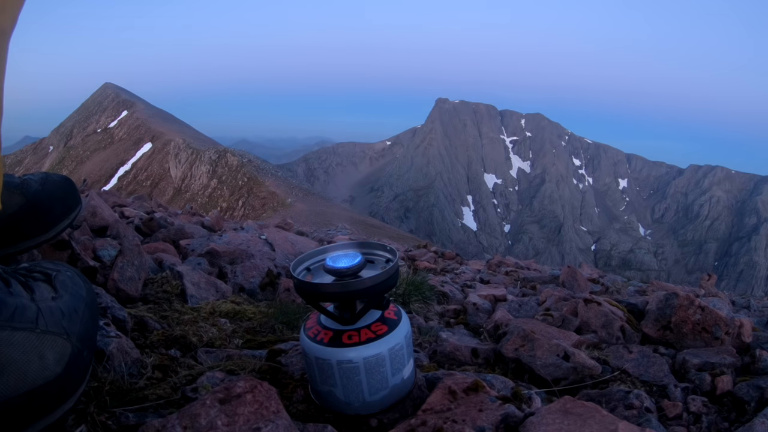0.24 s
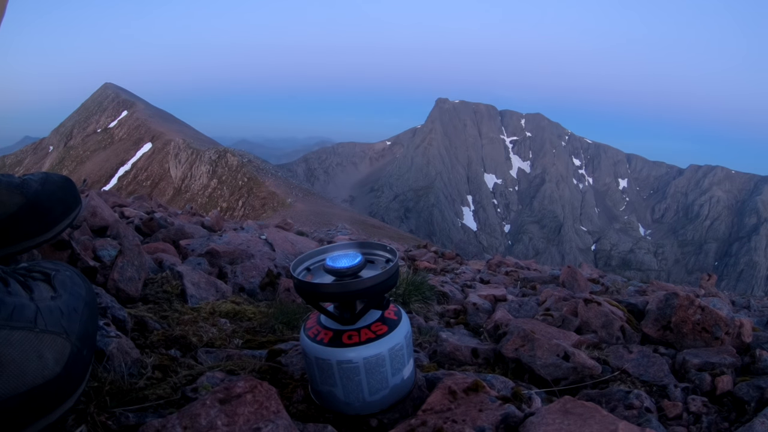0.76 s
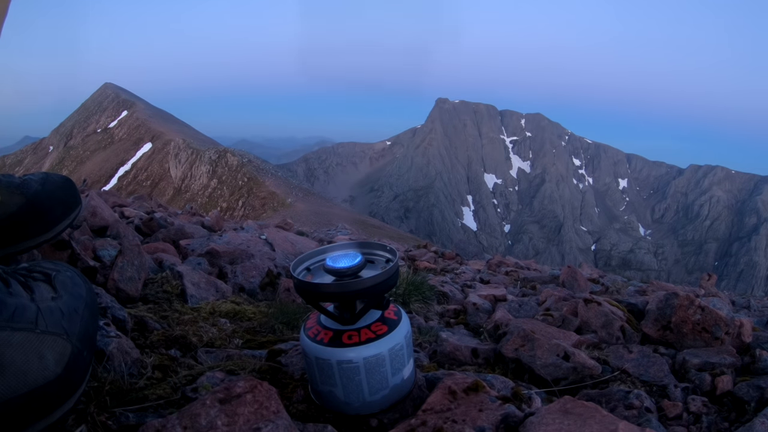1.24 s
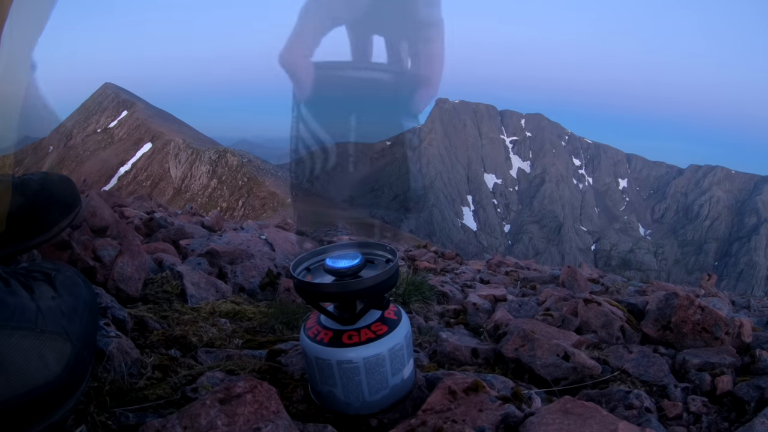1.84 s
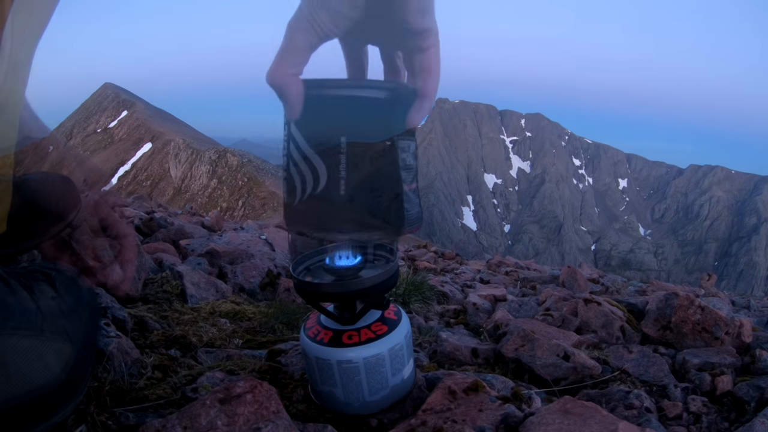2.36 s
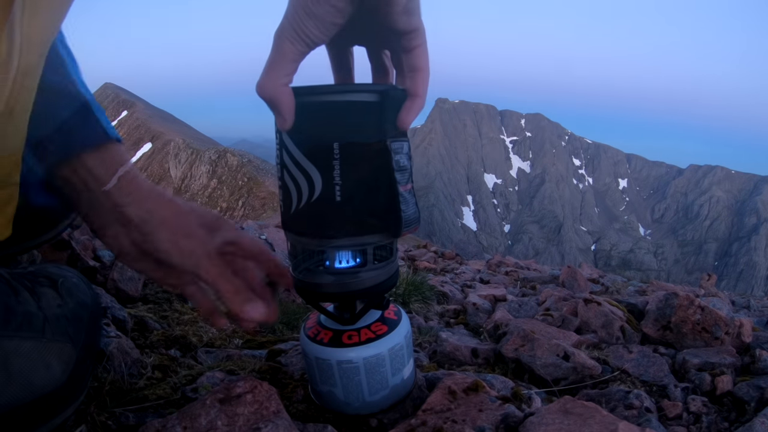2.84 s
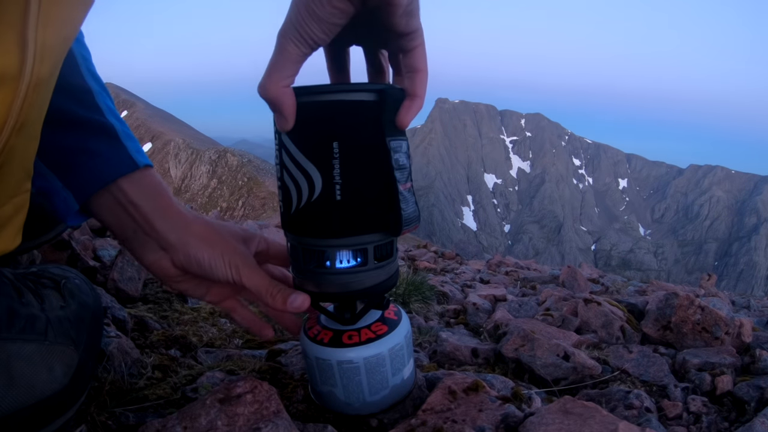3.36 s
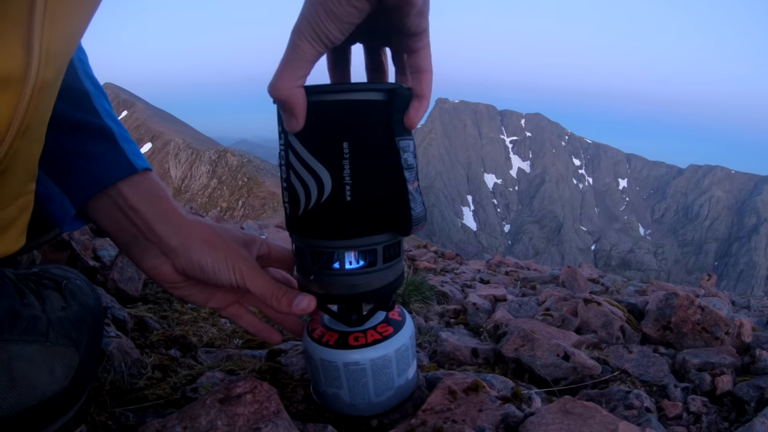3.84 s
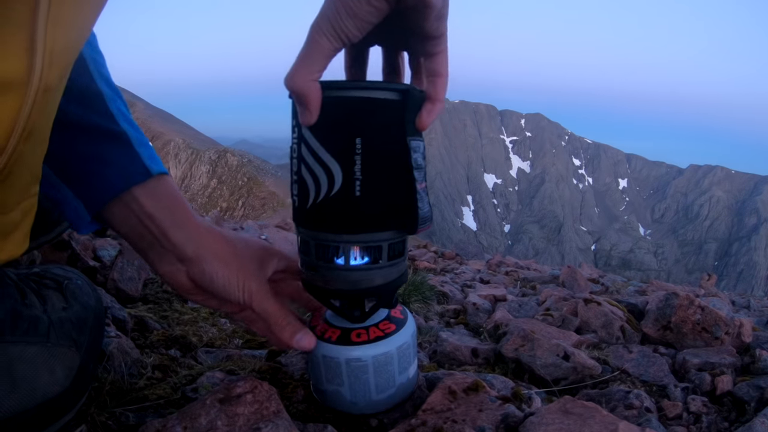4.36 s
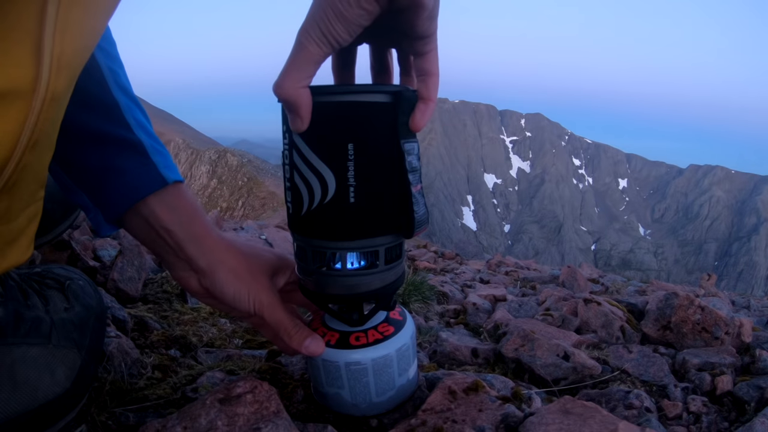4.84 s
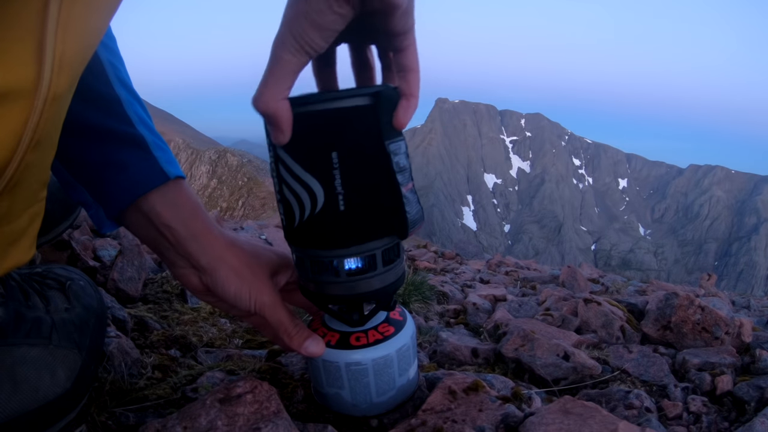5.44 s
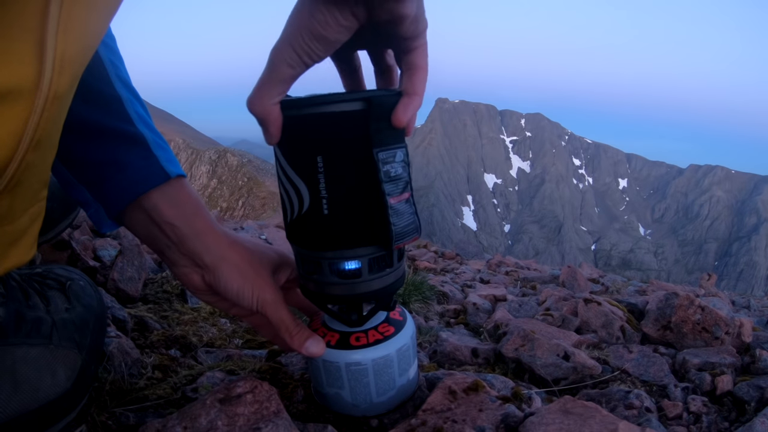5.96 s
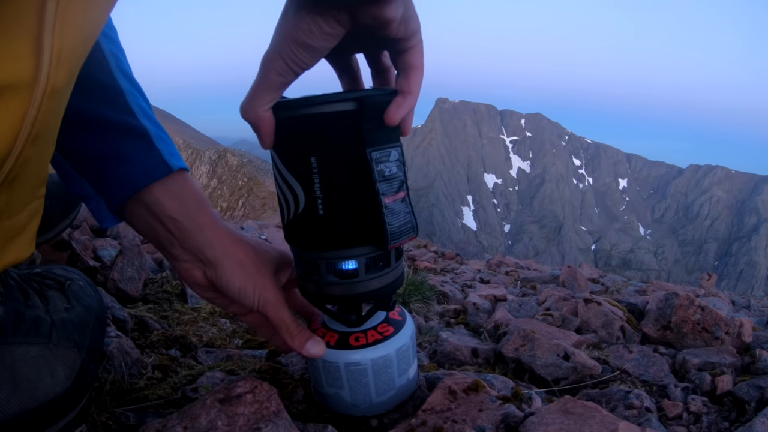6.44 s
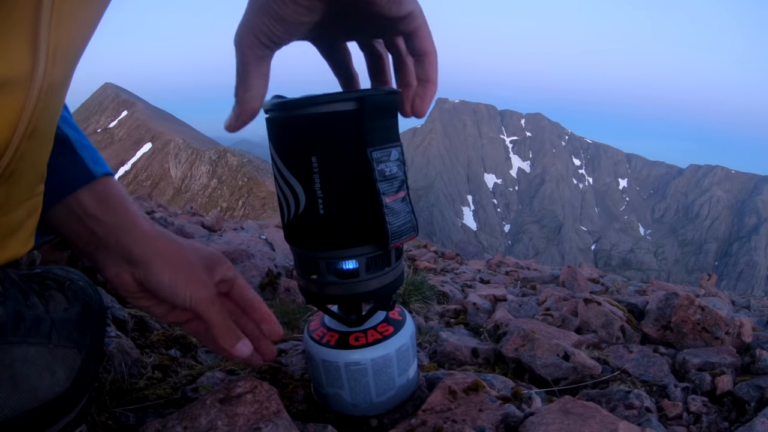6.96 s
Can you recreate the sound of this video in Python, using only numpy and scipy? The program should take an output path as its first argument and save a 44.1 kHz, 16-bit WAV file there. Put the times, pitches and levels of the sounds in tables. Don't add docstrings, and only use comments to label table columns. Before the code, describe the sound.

Fluttering low gas flame and soft jet hiss outdoors, then light metallic clinks, a hard clunk as a cup seats, and a twisting snap.

```python
import sys
import numpy as np
from scipy import signal
from scipy.fft import rfft, irfft, next_fast_len
from scipy.io import wavfile
from scipy.ndimage import uniform_filter1d

SR = 44100
rng = np.random.default_rng(int(sys.argv[2]) if len(sys.argv) > 2 else 0)


def boost_factor(decibels):
    exponent = np.asarray(decibels, float) / 20
    return 10 ** exponent


def transcribe(u):
    v = np.clip(np.atleast_2d(u).T, -1, 1)
    q = np.round(v * 32767).astype(np.int16)
    wavfile.write(sys.argv[1], SR, q)


N = 317696
TIME = np.arange(N) / SR
STEPS = np.arange(0, N / SR, .001)


def curve(table):
    time_s, level_db = np.array(table).T
    return boost_factor(np.interp(TIME, time_s, level_db))


def walk(rate_hz):
    hold = int(SR / rate_hz)
    levels = np.repeat(rng.standard_normal(N // hold + 1), hold)
    return 1.85 * uniform_filter1d(uniform_filter1d(levels, hold), hold)[:N]


def noise_band(order, cutoff_hz, kind, x):
    return signal.sosfilt(signal.butter(order, cutoff_hz, kind, fs=SR, output="sos"), x)


def band_rms(x, lo_hz, hi_hz):
    hz = np.fft.rfftfreq(len(x), 1 / SR)
    inside = (hz > lo_hz) & (hz < hi_hz)
    return np.sqrt(2 * np.sum(np.abs(rfft(x)[inside]) ** 2)) / len(x)


def turbulence(source, colour, flicker_db, flicker_rate, count):
    size = next_fast_len(N)
    place = np.log(np.fft.rfftfreq(size, 1 / SR) + 1)
    hz, db = np.array(colour).T
    points = np.log(hz)
    spectrum = rfft(source, size) * boost_factor(np.interp(place, points, db, left=-120, right=-120))
    centres = np.linspace(points[0], points[-1], count)
    out = 0
    for row in np.eye(count):
        band = irfft(spectrum * np.interp(place, centres, row), size)[:N]
        out = out + band * boost_factor(flicker_db * walk(flicker_rate))
    return out


def steady(x, span_s, share):
    k = int(span_s * SR)
    power = uniform_filter1d(uniform_filter1d(x ** 2, k), k)
    even = x / power ** (share / 2)
    return even * np.std(x) / np.std(even)


def peaks(rows, rise, fall, rest_db):
    s, db = np.array(rows).T[:, :, None]
    slopes = (db - np.maximum(rise * (s - STEPS), fall * (STEPS - s))).max(axis=0)
    return np.maximum(np.interp(TIME, STEPS, slopes), rest_db)


def strokes(rows, rise):
    s, hold, db, fade = np.array(rows).T[:, :, None]
    before, after = rise * (s - STEPS), fade * (STEPS - s - hold)
    shape = db - np.maximum(np.maximum(before, after), 0)
    return boost_factor(np.interp(TIME, STEPS, shape.max(axis=0)))


def ring(hz, t60, size, spread=1):
    t = TIME[:size]
    return np.sin(2 * np.pi * (hz * t + spread * rng.random())) * np.exp(-np.log(1000) * t / t60)


def onset(rise_s, size):
    return np.minimum(TIME[:size] / rise_s, 1)


def add(track, sound, s):
    i = int(s * SR)
    track[i:i + len(sound)] += sound[:N - i]


# time_s, level_db
FLAME_REST = [
    (0, -38),
    (1.5, -37.5),
    (2.6, -37),
    (3.2, -36),
    (4.2, -35),
    (5.2, -37),
    (6.2, -35.5),
    (6.75, -35),
    (7.2, -38),
]
# peak_s, level_db
FLARES = [(0.309, -36.5), (0.549, -35), (0.793, -34.0), (0.923, -32), (1.182, -32.5), (1.556, -34.5),
          (1.861, -33), (2.205, -30), (2.385, -31.7), (2.529, -28), (2.839, -32.5), (3.133, -33.5),
          (3.462, -34.5), (3.552, -35.5), (3.756, -25.5), (3.861, -28), (4.18, -30), (4.565, -32),
          (4.674, -31), (4.769, -32.5), (4.969, -35.1), (5.113, -33), (5.223, -31), (5.498, -30),
          (5.617, -27.5), (5.946, -34.5), (6.091, -34), (6.356, -31), (6.545, -37), (6.859, -30.5)]
# lowest_s, level_db
LULLS = [(0.354, -49.5), (0.748, -44), (0.963, -43.5), (1.397, -45.5), (1.671, -47.5), (2.07, -47),
         (2.3, -43.5), (2.749, -44.5), (3.697, -41.7), (4.62, -43), (4.934, -43), (5.398, -47.5),
         (6.395, -45.5), (6.71, -47), (6.909, -41.5), (7.104, -44.5)]
FLARE_DB_PER_S, LULL_DB_PER_S, FLARE_EXTRA_DB, LULL_EXTRA_DB = 160.5, 330, 1.5, -0.5


def burning():
    rest_db = np.interp(TIME, *np.array(FLAME_REST).T)
    up = peaks(np.add(FLARES, [0, FLARE_EXTRA_DB]), FLARE_DB_PER_S, FLARE_DB_PER_S, rest_db)
    dips = np.add(LULLS, [0, LULL_EXTRA_DB]) * [1, -1]
    down = -peaks(dips, LULL_DB_PER_S, LULL_DB_PER_S, 0)
    return boost_factor(np.minimum(up, down))


# pitch_hz, density_db
ROAR_COLOUR = [(12, -50.5), (20, -19), (38, -5.5), (70, -16.5), (117, -17), (134, -7), (152, 2),
               (178, -1.5), (265, -10), (333, -17.5), (390, -20.5), (448, -29), (855, -39.5), (1000, -54.5),
               (1300, -57), (1690, -68.5), (2860, -120)]


def roar(gusts):
    source = rng.standard_normal(N) * boost_factor(gusts)
    tone = turbulence(source, ROAR_COLOUR, flicker_db=1.0, flicker_rate=9.2, count=7)
    tone = steady(tone, span_s=0.082, share=0.9)
    tone /= band_rms(tone, 120, 400)
    tone = noise_band(3, 112, "high", tone)
    swell = burning()
    body = noise_band(2, 430, "low", tone)
    edge = (tone - body) * uniform_filter1d(swell, SR // 2) ** 0.58 * swell ** 0.44
    return body * swell + edge


# peak_s, level_db
PUFFS = [(0.175, -39), (0.519, -39), (0.728, -44.5), (0.928, -45.5), (1.157, -39), (1.522, -44.9),
         (1.761, -41), (1.921, -45), (2.17, -41.5), (2.285, -43), (2.355, -40.5), (2.469, -46),
         (2.549, -47), (2.714, -56), (2.878, -43.5), (3.243, -45), (3.522, -55), (3.771, -34.1),
         (3.886, -42.0), (4.205, -46), (4.654, -41), (4.799, -40.5), (4.914, -47.5), (5.083, -39.5),
         (5.632, -34.5), (5.966, -58), (6.171, -53), (6.49, -53), (6.894, -37.5), (7.014, -51),
         (3.82, -42),
    (3.95, -44),
    (4.7, -47),
    (5.575, -34),
    (5.68, -39.5),
    (6.79, -47.5),
]
PUFF_REST_DB, PUFF_RISE_DB_PER_S, PUFF_FALL_DB_PER_S, PUFF_EXTRA_DB = -59, 297.5, 220.5, 2


def puffing(gusts):
    puffs = noise_band(2, [70, 108], "band", rng.standard_normal(N))
    puffs = steady(puffs, span_s=.04, share=.9)
    puffs *= boost_factor(2.1 * gusts - 1.0) / band_rms(puffs, 45, 130)
    air = noise_band(2, 62, "low", rng.standard_normal(N))
    level_db = peaks(PUFFS, PUFF_RISE_DB_PER_S, PUFF_FALL_DB_PER_S, PUFF_REST_DB)
    return (puffs + boost_factor(18.0) * air) * boost_factor(PUFF_EXTRA_DB + level_db)


def flame():
    gusts = 1.16 * walk(20)
    return roar(gusts) + puffing(gusts)


# time_s, level_db
JET = [
    (0.0, -55.5),
    (1.18, -55.5),
    (1.43, -58),
    (2.05, -61),
    (2.22, -61),
    (2.57, -70.5),
    (2.9, -58),
    (3.03, -63.5),
    (3.1, -76.5),
    (3.3, -94),
]
# time_s, level_db
DARK_HISS = [(0, -75), (1.3, -62.5), (2.55, -57.5), (2.9, -69), (3.1, -63), (3.92, -58), (5.13, -60.5),
             (6.1, -59), (6.7, -62), (6.92, -59), (7.0, -55.5), (7.2, -59)]
# start_s, hold_s, level_db, fade_db_per_s
GAP = [
    (2.85, 0.29, -57.5, 39.5),
]
# pitch_hz, density_db
JET_COLOUR = [(710, -54), (1200, -26.5), (1450, -18.5), (1790, -6.5), (2120, -5.5), (2270, -1), (2570, 0),
              (2860, -6.5), (3390, -9), (3660, -6.5), (4100, -10.5), (4350, -8), (4950, -13), (5450, -8.5),
              (5760, -3), (6200, -9.5), (7040, -14.5), (7550, -14.5), (9820, -50), (16600, -120)]
# pitch_hz, density_db
DARK_HISS_COLOUR = [(650, -54), (1100, -47), (1340, -17.5), (1790, 3), (1980, 5), (2140, 6), (2340, -3),
                    (2500, 1.5), (2780, -1), (3350, -11.5), (3730, -12.5), (4080, -27.5), (4600, -31),
                    (5150, -31.5), (5980, -53), (10100, -120)]
GAP_RISE_DB_PER_S = 41


def jet():
    bare = turbulence(rng.standard_normal(N), JET_COLOUR, flicker_db=.7, flicker_rate=40, count=9)
    gap = noise_band(3, [2250, 2950], "band", bare[::-1])
    dark = turbulence(rng.standard_normal(N), DARK_HISS_COLOUR, flicker_db=1.53, flicker_rate=17, count=6)
    free = bare * curve(JET) / band_rms(bare, 4000, 7500)
    escaping = gap * strokes(GAP, GAP_RISE_DB_PER_S) / np.std(gap)
    return free + escaping + dark * curve(DARK_HISS) / band_rms(dark, 1600, 3200)


# start_s, top_db, low_db, wall_db, rim_db
KNOCKS = [(1.8364, -55, -45, -34.5, -42), (1.868, -63, -49, -43, -62), (1.882, -60, -49, -47, -65),
          (1.926, -62, -49, -52, -56), (1.936, -53, -52, -48, -56), (2.1485, -48, -70, -60, -53),
          (2.1924, -51, -73, -47, -47), (2.311, -48, -72, -50, -47.5), (2.325, -44, -75, -40, -40),
          (2.4996, -42, -80, -34, -38), (2.502, -40, -80, -41, -32.5), (2.5048, -46, -81, -38, -37),
          (2.508, -45, -80.5, -48, -44),
          (3.689, -81, -60, -54, -72), (3.7325, -43, -47, -46, -54), (3.8085, -58, -52, -50, -57),
               (3.8342, -27.5, -36.5, -39.5, -45), (3.8462, -38, -47, -40, -58),
               (3.857, -42, -59, -52, -45), (3.882, -54, -59, -47, -54), (3.9604, -55, -63, -59, -73),
               (4.0542, -51, -67, -49.5, -58), (4.129, -59, -52, -46, -58), (4.2473, -50, -75, -53, -50),
               (4.2804, -58, -61, -54, -66), (4.3056, -51.5, -72, -46.5, -55), (5.3163, -56, -53, -53, -79),
               (5.4686, -57, -59, -56, -65), (5.514, -55, -62, -57, -63), (5.5232, -57, -47, -45, -51),
               (5.5463, -57, -50, -47, -58), (5.5807, -43, -33, -36, -31), (5.594, -50, -42, -51, -54),
               (5.611, -44, -50, -51, -56), (5.619, -39, -37, -36.5, -30.5), (5.633, -57, -54, -49, -50),
               (5.7653, -65, -62, -52, -61), (5.8995, -50, -63, -51, -64), (6.101, -48, -55.5, -52, -46.5),
               (6.2462, -65, -59, -56, -79)]
# pitch_hz, level_db, share of the ring time
LOW_MODES = [(470, 0, 0.54), (655, -2, 1), (750, 2.5, 1), (1000, -5, 0.82), (1170, -7, 0.28),
             (1190, -15, 0.31)]
# pitch_hz, level_db, share of the ring time
WALL_MODES = [(1806, 2, 0.87), (1930, 4.5, 0.96), (2140, 0.5, 0.56), (2260, -2, 0.8), (2560, -2.5, 1),
              (2650, -9, 0.84)]
# pitch_hz, level_db, share of the ring time
RIM_MODES = [(3100, 0, 0.35), (3240, 1.5, 0.35), (3580, 7, 0.41), (3720, 0.5, 0.4), (4230, -4.5, 0.5)]
# pitch_hz, level_db, share of the ring time
TOP_MODES = [(4440, -9, 0.42), (4770, -6.5, 0.626), (5205, -2.5, 0.84), (5820, -4, 0.77), (6070, -4, 0.48),
             (6680, -10.5, .4), (7070, -8.5, .4)]
HELD_T60_S = 0.024
SOFT_CONTACT_S, HARD_FROM_DB, SHORTER_S_PER_DB = 0.0088, -42.5, 0.14
PRESS_S = .0012


def knocks():
    out, size = np.zeros(N), SR // 8
    groups = (LOW_MODES, WALL_MODES, RIM_MODES, TOP_MODES)
    for s, top_db, low_db, wall_db, rim_db in KNOCKS:
        contact_s = SOFT_CONTACT_S - SHORTER_S_PER_DB * max(rim_db - HARD_FROM_DB, 0)
        decay = np.exp(-TIME[:size] / max(contact_s / 2, .0005))
        push = rng.standard_normal(size) * decay * onset(PRESS_S, size)
        for modes, level_db in zip(groups, (low_db, wall_db, rim_db, top_db)):
            body = np.zeros(size)
            for hz, db, share in modes:
                gain = boost_factor(db + 1.3 * rng.standard_normal())
                detuned_hz = hz * (1 + 0.013 * rng.standard_normal())
                body += gain * ring(detuned_hz, HELD_T60_S * share, size)
            sound = signal.fftconvolve(push, body)[:size]
            sound = noise_band(4, 1.106 * modes[0][0], "high", sound)
            add(out, boost_factor(level_db + 1.5) * sound / np.abs(sound).max(), s)
    return out


# start_s, pitch_hz,
# level_db, t60_s, rattle (0-1)
PING = [(1.837, 1270, -43, .07, .3), (1.837, 3550, -42, .03, .2), (1.84, 2500, -48, .06, .5),
        (1.845, 1300, -51, .12, .7), (1.9, 870, -57, .15, .8), (1.88, 3680, -60, .4, .4),
        (2.188, 3720, -49, .16, .4), (2.19, 1850, -50, .16, .5), (2.326, 3690, -42, .085, .3),
        (2.325, 2750, -39, .03, .2), (2.327, 4790, -48, .07, .4), (2.325, 6050, -40, .045, .3),
        (2.325, 7250, -47, .03, .3), (2.499, 4690, -33, .05, .3), (2.504, 5206, -44, .11, .2),
        (2.5, 1860, -29.5, .03, .1), (2.502, 3600, -34, .03, .2), (2.501, 2600, -39, .03, .3),
        (2.9, 3200, -70, .6, .96), (3.25, 4830, -76, .3, 1), (3.355, 5200, -69.5, .2, 1),
             (3.365, 5850, -72, .06, 1), (3.4, 4790, -74.5, .5, 1), (3.635, 4750, -70, .12, .8),
             (3.733, 5350, -43, .05, .4), (3.736, 6080, -44, .14, .3), (3.736, 780, -45, .07, .4),
             (3.736, 1850, -48, .05, .3), (3.834, 5850, -30, .03, .1), (3.836, 5760, -36, .07, .4),
             (3.835, 1860, -38, .05, .3), (3.836, 790, -39, .1, .03), (3.845, 6000, -36, .06, .3),
             (3.845, 7700, -47, .08, .7), (3.846, 1860, -39, .04, .3), (3.856, 6090, -41, .08, .5),
             (3.857, 5700, -42, .06, .5), (3.957, 6100, -62, .08, .6), (4.3, 3810, -58, .2, .6),
             (5.522, 5800, -54, .06, .4), (5.524, 720, -45, .09, .4), (5.545, 4500, -51, .05, .3),
             (5.581, 1860, -35, .03, .1), (5.581, 4950, -41, .02, .2), (5.581, 3000, -37, .02, .2),
             (5.583, 800, -41, .16, .82), (5.583, 590, -39, .074, .3), (5.61, 4800, -48, .03, .3),
             (5.619, 3850, -36, .025, .2), (5.62, 3350, -35, .025, .2), (5.62, 1100, -36, .032, .2),
             (5.62, 5130, -41, .025, .2), (5.663, 6050, -62, .06, .4), (6.244, 5250, -66, .05, .4)]


def pings():
    out, size = np.zeros(N), 3 * (SR // 8)
    for s, hz, db, t60, rattle in PING:
        shake = uniform_filter1d(rng.standard_normal(size), size=120) * np.sqrt(120)
        roughness = 1 + rattle * (shake - 1) * onset(0.012, size)
        add(out, boost_factor(db) * ring(hz, t60, size) * roughness * onset(0.0015, size), s)
    return out


# start_s, pitch_hz, level_db, t60_s, until_s
WIRE = [
    (1.8375, 1787, -37.5, .6, 1.886),
    (1.897, 1789, -49.5, .6, 2.05),
    (3.81, 3760, -62, .8, 3.84),
    (3.838, 3765, -50, .6, 3.879),
]


def wire():
    out, size = np.zeros(N), 3 * (SR // 8)
    for s, hz, db, t60, until in WIRE:
        touch = np.clip((until - s - TIME[:size]) / 0.0048, 0, 1)
        tone = ring(hz, t60, size, spread=0) * onset(0.0041, size) * touch
        add(out, boost_factor(db) * tone * boost_factor(0.95 * walk(60)[:size]), s)
    return out


# start_s, level_db, from_hz, to_hz
CRACKS = [
    (2.3255, -36, 2000, 7000),
    (3.734, -40, 1500, 7000),
    (3.835, -33, 1500, 6500),
    (5.582, -34, 600, 4500),
    (5.6205, -29, 800, 4800),
]


def cracks():
    out, size = np.zeros(N), SR // 8
    for s, db, lo_hz, hi_hz in CRACKS:
        crack = noise_band(2, [lo_hz, hi_hz], "band", signal.unit_impulse(size))
        add(out, boost_factor(db) * crack / np.abs(crack).max(), s)
    return out


# start_s, level_db, pitch_hz
THUMPS = [
    (2.505, -21, 155),
    (3.737, -7, 157),
    (3.837, -8, 173),
    (5.576, -14, 159.4),
    (5.613, -24.5, 171),
]


def thumps():
    out, size = np.zeros(N), SR // 8
    for s, db, hz in THUMPS:
        add(out, boost_factor(db - 4.0) * ring(hz, 0.051, size) * onset(0.017, size), s)
    return out


# start_s, hold_s, level_db, fade_db_per_s
THIN_HISS = [(3.7, 0.66, -83, 200), (4.75, 1.05, -84, 40), (3.185, 0.12, -72.5, 52), (3.52, .01, -75, 304),
             (3.64, .02, -75, 88), (4.624, 0.034, -72, 151), (4.674, .01, -68.5, 250), (4.8, .06, -78.5, 500),
             (4.85, .01, -76, 299), (4.94, .01, -84, 200), (4.985, .015, -82, 200), (5.04, .07, -78, 100),
             (5.17, 0.046, -77, 63), (5.27, .02, -83, 200), (5.41, .015, -79, 301), (5.36, .02, -83, 200),
             (5.32, .005, -71, 400)]
# start_s, hold_s, level_db, fade_db_per_s
SEAT = [
    (3.712, .01, -83, 600),
    (3.734, 0.015, -58, 500),
    (3.77, 0.032, -69, 100),
    (3.81, 0.016, -61, 300),
    (3.838, 0.016, -44.5, 600),
    (3.89, 0.036, -65.5, 200),
    (3.96, 0.0093, -67.5, 250),
    (4.054, .004, -63, 300),
    (4.14, 0.026, -62, 300),
]
# start_s, hold_s, level_db, fade_db_per_s
TWIST = [(2.33, 0.044, -60, 300), (2.503, .012, -55.5, 600), (2.525, .018, -58, 500),
         (4.25, .005, -64, 400), (4.28, 0.039, -66.5, 350), (4.34, 0.055, -75.5, 250),
         (5.44, 0.054, -74, 300), (5.522, 0.11, -61, 210), (5.766, 0.0091, -73, 200),
         (5.865, .005, -80, 500), (5.915, 0.033, -58, 400), (6.004, 0.09, -62, 330),
         (6.244, .003, -78, 700), (6.742, 0.022, -70, 270), (6.78, 0.024, -73.5, 200),
         (6.915, .03, -82, 200), (6.95, 0.035, -79, 150), (7.03, .03, -84.5, 300)]
# start_s, hold_s, level_db, fade_db_per_s
GRIND = [
    (1.845, .09, -62.5, 300),
    (3.736, .02, -61, 300),
    (3.81, .02, -54, 200),
    (3.838, .04, -58, 300),
    (4.11, .05, -61.5, 200),
    (5.32, .005, -64.5, 400),
    (5.525, .04, -60, 200),
    (5.565, .045, -51, 200),
    (5.62, .03, -56, 150),
    (5.68, .025, -63.5, 300),
]
# start_s, hold_s, level_db, fade_db_per_s
SEAM = [
    (6.42, 0.089, -90.5, 99),
    (6.64, .1, -84.5, 102),
    (7.11, 0.099, -85, 100),
]
# pitch_hz, density_db
THIN_HISS_COLOUR = [(2350, -38), (4000, -10.5), (4450, -10.5), (4770, 0), (5180, -3), (5900, 3.5), (6140, -5),
                    (6370, -6.5), (7550, -19), (9820, -49), (16600, -120)]
# pitch_hz, density_db
SEAT_COLOUR = [(1650, -44), (2800, -28.5), (3520, -23), (3640, -8.5), (3790, -9.5), (3970, -17),
               (4610, -17.5), (5960, -2), (6290, -0.5), (6370, -15.5), (6690, -10), (7100, -13),
               (7500, -29), (9820, -69.5), (16600, -120)]
# pitch_hz, density_db
TWIST_COLOUR = [(1650, -24.5), (2800, -2.5), (3020, 0.5), (3470, -5.5), (3850, -1), (4210, -7.5),
                (4860, -2.5), (5330, -5.5), (5760, -4.5), (6530, -7), (7550, -17.5), (9820, -41.5),
                (16600, -120)]
# pitch_hz, density_db
GRIND_COLOUR = [(300, -30), (500, 2), (800, 3.5), (1000, -9), (1350, -10), (1900, -5), (2600, -9),
                (3600, -18), (5000, -41.5)]
# pitch_hz, density_db
SEAM_COLOUR = [(3000, -32.5), (3800, -4), (4250, 6), (4700, -3.5), (5150, 0.5), (5500, -16), (6500, -30)]
SCRAPE_RISE_DB_PER_S, SLOW_RISE_DB_PER_S = 2600.5, 699.5


def rubbing():
    bursts_db = 1.5 * rng.exponential(size=N) * (rng.random(N) < .08)
    slips = rng.standard_normal(N) * boost_factor(bursts_db + 2.2 * walk(90))
    bright, dull = (4200, 7500), (500, 3000)  # Hz, where the level is set
    scrapes = (
        (THIN_HISS, THIN_HISS_COLOUR, SLOW_RISE_DB_PER_S, bright),
        (SEAT, SEAT_COLOUR, SCRAPE_RISE_DB_PER_S, bright),
        (TWIST, TWIST_COLOUR, SCRAPE_RISE_DB_PER_S, bright),
        (GRIND, GRIND_COLOUR, SLOW_RISE_DB_PER_S, dull),
        (SEAM, SEAM_COLOUR, SLOW_RISE_DB_PER_S / 4, bright),
    )
    out = np.zeros(N)
    for table, colour, rise, band_hz in scrapes:
        scrape = turbulence(slips, colour, flicker_db=1.5, flicker_rate=30, count=6)
        out += scrape * strokes(table, rise) / band_rms(scrape, *band_hz)
    return out


def scene():
    cup = rubbing() + knocks() + pings() + wire() + cracks() + thumps()
    return (flame() + jet() + cup)[None]


def shaped(x, gains):
    size = next_fast_len(N + SR // 8)
    gain = boost_factor(np.interp(np.fft.rfftfreq(size, 1 / SR), *np.array(gains).T))
    return irfft(rfft(x, size) * gain, size)[..., :N]


# pitch_hz, level_db
CUT = [(7350, 0), (7550, -3), (7750, -13), (7980, -21), (8080, -45), (8300, -90)]
# pitch_hz, level_db
IMAGE = [(7900, -90), (8060, -46), (8200, -24.5), (8600, -20.5), (9200, -31.5), (9600, -43.5), (10200, -91)]


def slow_sampling(dry):
    sample_hz = 16000
    mirror = 2 * dry * np.cos(2 * np.pi * sample_hz * TIME)
    return shaped(dry, CUT) + shaped(mirror, IMAGE)


def band_limit(x):
    return signal.sosfilt(signal.butter(12, 15720, fs=SR, output="sos"), x)


def record(dry):
    dry = dry * np.clip((TIME[-1] - TIME) / .012, 0, 1)
    noise = boost_factor(-92.5) * rng.standard_normal(dry.shape)
    return band_limit(slow_sampling(dry) + noise)


dry = scene()
out = record(dry)
transcribe(out)
```